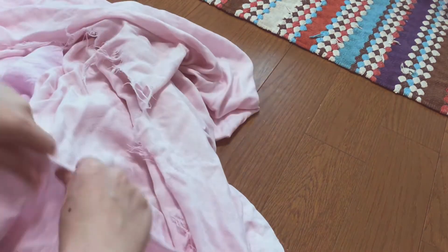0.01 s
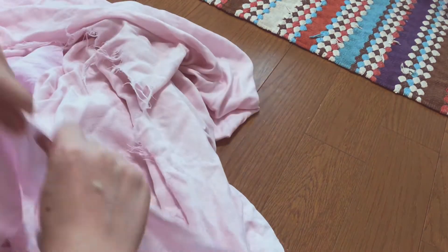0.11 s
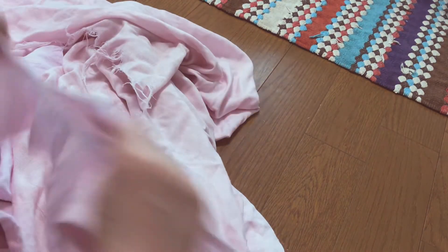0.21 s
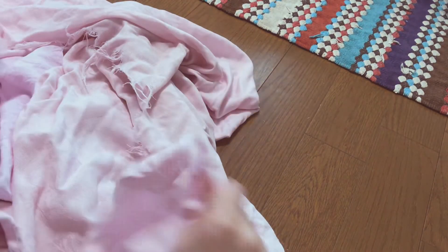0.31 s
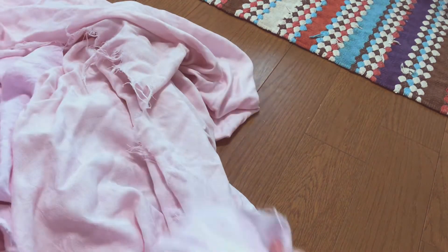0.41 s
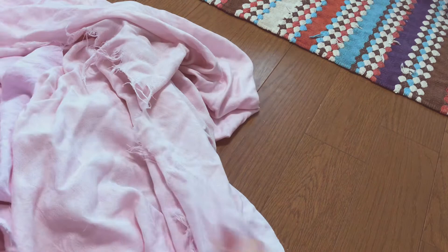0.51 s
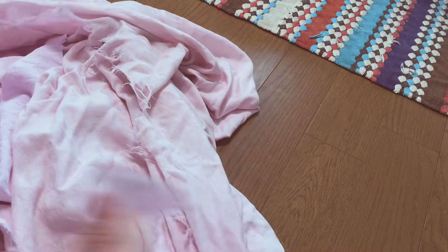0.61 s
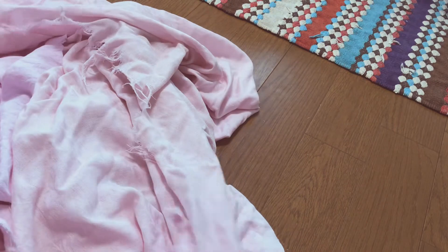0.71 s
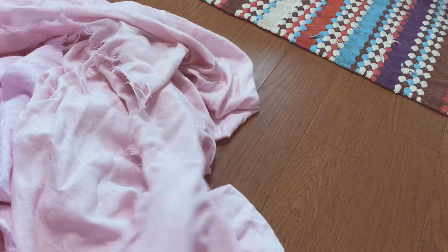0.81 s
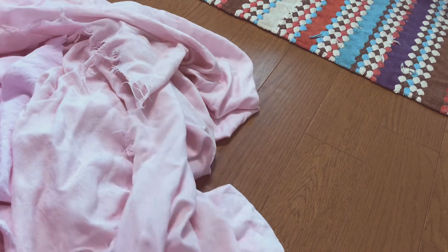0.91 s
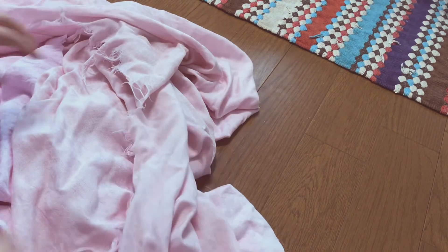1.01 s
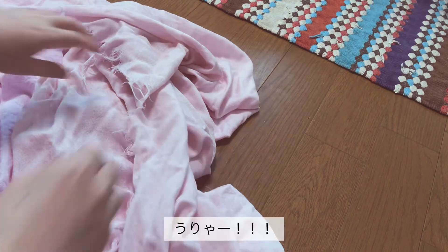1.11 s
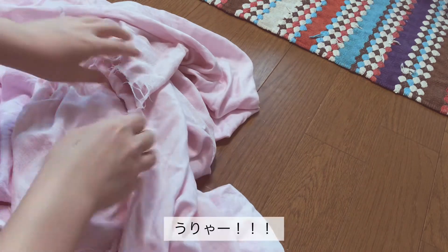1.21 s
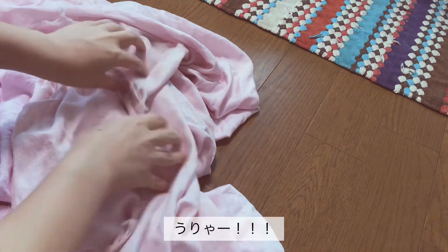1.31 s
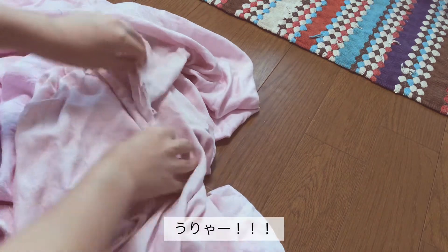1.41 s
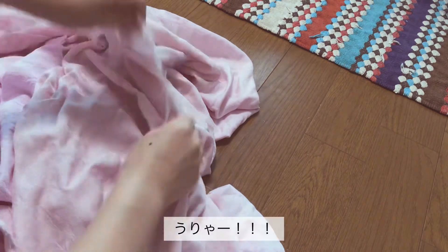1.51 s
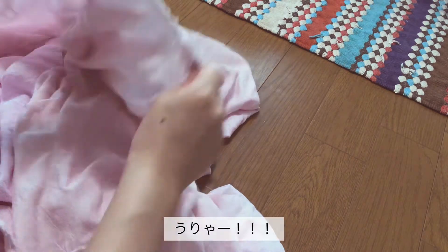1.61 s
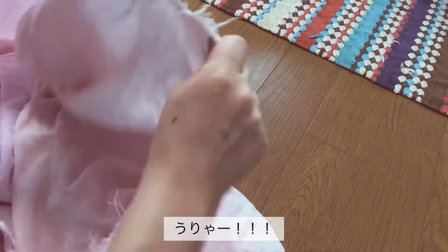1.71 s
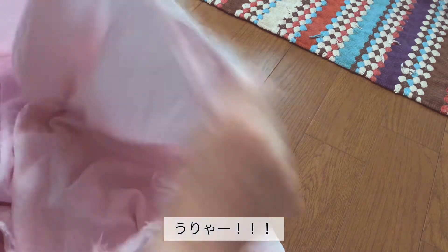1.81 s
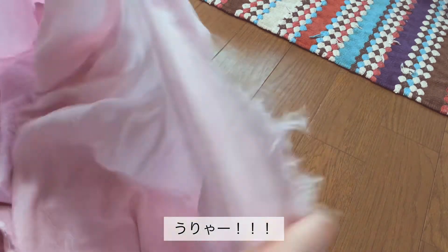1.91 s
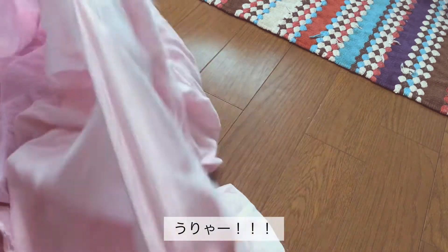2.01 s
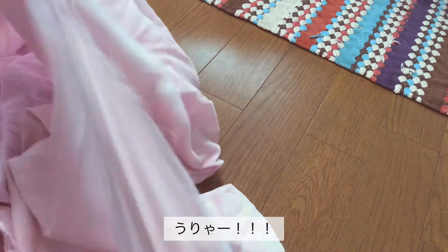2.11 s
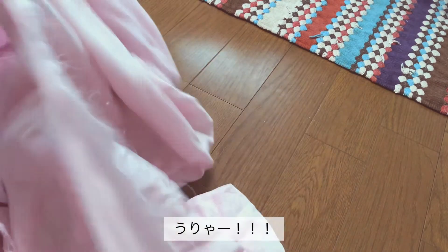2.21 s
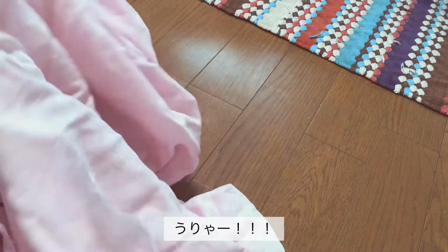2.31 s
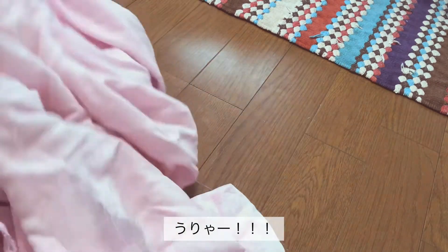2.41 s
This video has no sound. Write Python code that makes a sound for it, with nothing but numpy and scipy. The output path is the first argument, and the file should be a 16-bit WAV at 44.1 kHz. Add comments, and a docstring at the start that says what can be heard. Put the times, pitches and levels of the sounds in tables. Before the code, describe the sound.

Cotton cloth is ripped by hand close to the microphone: one bright, crackling tear at the start, a long pause with faint sliding fabric and a soft hand thud, then two short, jerky, duller rips in a quiet room.

```python
"""Three short rips are heard first of all: an old cotton sheet torn by hand close to the microphone, in a
quiet room. Random thread snaps ring fibres, threads, cloth, fold, sheet and flap; lone strong threads tick on top.
Between rips sliding cloth hisses faintly, as shaped noise, and a hand lands softly as a few dull decaying modes.
Feedback delays give the room's reply. Behind lie noise bands of room tone, hum, rumble and a thin high whirr."""
import sys
import numpy as np
from scipy import signal
from scipy.fft import rfft, irfft, next_fast_len
from scipy.io import wavfile
from scipy.ndimage import uniform_filter1d

SR = 44100
rng = np.random.default_rng(int(sys.argv[2]) if len(sys.argv) > 2 else 0)


def master(y):
    """Save y as 16-bit WAV."""
    cut = np.clip(np.atleast_2d(y).T, -1, 1)
    pcm = np.round(cut * 32767)  # scale
    wavfile.write(sys.argv[1], SR, pcm.astype(np.int16))


N = 110250  # length in samples: 2.5 s


def from_db(db):
    """Decibels to gain."""
    return 10 ** (np.asarray(db) / 20)


def rms_one(x):
    """Scale to rms 1."""
    return x / np.sqrt(np.mean(x ** 2) + 1e-20)


def in_time(rows):
    """Join the rows of a time table by straight lines; one curve per column, per sample."""
    seconds, *columns = np.transpose(rows)
    return [np.interp(np.arange(N) / SR, seconds, column) for column in columns]


def resonance(x, hz, width_hz):
    """Two-pole band-pass, gain 1 on top: a wider band rings for a shorter time."""
    radius = np.exp(-np.pi * width_hz / SR)
    feed = np.array([1, 0, -1]) * (1 - radius ** 2) / 2
    feedback = [1, -2 * radius * np.cos(2 * np.pi * hz / SR), radius ** 2]
    return signal.lfilter(feed, feedback, x + 1e-18)


def drift(rate_hz):
    """Slow random wander with rms 1: noise through two equal one-pole low-passes."""
    pole = np.exp(-2 * np.pi * rate_hz / SR)
    wander = signal.lfilter([1], [1, -2 * pole, pole ** 2], rng.standard_normal(N + SR))
    return rms_one(wander[SR:])  # the first second lets the filter settle


def high_pass(x, order, hz):
    """Butterworth high-pass: takes away what lies below hz."""
    return signal.sosfilt(signal.butter(order, hz, "high", fs=SR, output="sos"), x)


def coloured(spectrum, patchy_db):
    """Half-octave bands of noise, each with its own level and flicker; rms 1."""
    hz, db = np.transpose(spectrum)
    edges = 22 * 2 ** np.arange(0, 9.9, .5)
    white = rng.standard_normal((2, N + SR))  # neighbouring bands take different noise
    out = 0
    for k, (low, high) in enumerate(zip(edges, edges[1:])):
        band_filter = signal.butter(2, [low, high], "band", fs=SR, output="sos")
        band = signal.sosfilt(band_filter, white[k % 2])[SR:]
        band_db = np.interp(np.log(low * high) / 2, np.log(hz), db)
        out = out + band * from_db(band_db + patchy_db * drift(4.5))
    return rms_one(out)


EVEN_SAMPLES = 900  # span over which a ringing body is evened out


def struck(clicks, body, cycles):
    """Each click rings every resonance of a body with random strength; partly evened, then rms 1."""
    ring = 0
    for k, (hz, db) in enumerate(body):
        blows = clicks * from_db(rng.normal(0, 2.5, N))
        tone = resonance(resonance(blows, hz, hz / cycles), hz, 4.8 * hz / cycles)
        ring = ring + (-1) ** k * from_db(db) * tone
    power = uniform_filter1d(ring ** 2, size=EVEN_SAMPLES)
    return rms_one(ring / (power + 1e-12) ** 0.33)


# The tear jumps ahead in jerks. Each row: start in seconds, length in seconds, extra level in dB.
JERKS = [(1.838, .002, 8), (1.874, .0015, 10), (1.877, .002, 8), (1.882, .006, 5), (1.892, .004, 7),
         (1.903, .012, 4), (1.917, .006, 5), (1.934, .0085, 7), (1.949, .004, 9), (1.967, .002, 7),
         (1.974, .003, 5), (1.987, .0045, 10), (1.994, .003, 9), (2.0015, .0012, 14), (2.009, .003, 9),
         (2.143, .002, 7), (2.152, .006, 12), (2.160, .003, 6), (2.168, .0022, 14), (2.176, .004, 13),
         (2.1825, .007, 10), (2.204, .003, 6), (2.222, .006, 8), (2.239, .003, 13), (2.251, .008, 8),
         (2.276, .003, 5)]
JERK_FADE_S = .001


def jerks_db():
    """Each jerk sets in at once, holds and fades, as a rise in dB."""
    t = np.arange(N) / SR
    total = 0
    for start, length, db in JERKS:
        fade = np.exp(-np.clip((t - start - length) / JERK_FADE_S, 0, 50))
        total = total + db * (t >= start) * fade
    return total


# The three rips, close to the microphone, one list of rows each. Each row: time in seconds, then level in dB,
# before the jerks, of the finest crackle, thread snap, taut cloth's upper, middle and low ring, and flap.
RIP_LEVELS = [
    [(0.187, -46, -48, -71, -79, -74, -67), (0.191, -52, -46, -56.5, -60, -80, -65),
     (0.209, -50, -58, -66, -68, -75, -62), (0.223, -35.5, -42, -52, -58, -62, -80),
     (0.243, -41, -38, -49.5, -60, -64, -60), (0.261, -28, -48, -38, -43, -46.5, -68),
     (0.281, -28, -30, -31.5, -44, -59, -72), (0.297, -25, -32, -34.5, -49.5, -55, -60),
     (0.311, -33.5, -35.5, -44.5, -47, -56, -55), (0.323, -27.5, -33, -43, -46, -52, -62),
     (0.333, -28.5, -34.5, -36, -41.5, -48, -69), (0.34, -34.5, -36, -45.5, -51.5, -52, -47)],
    [(1.838, -57.5, -54.5, -52, -59, -45, -58), (1.854, -52, -52, -48, -48, -58.5, -50),
     (1.878, -45, -45.5, -39, -44, -43, -43.5), (1.892, -45, -45.5, -42.5, -48, -39, -39),
     (1.904, -41, -36.5, -35, -41, -47, -47), (1.926, -38, -41, -38.5, -37.5, -34, -47),
     (1.938, -44, -39.5, -42, -44, -48, -40), (1.95, -41.5, -45, -59, -51, -46, -40.5),
     (1.974, -49, -51, -45, -45, -40.5, -38.5), (1.982, -80, -64, -58, -63, -63, -64),
     (1.99, -50, -54.5, -49, -46, -45.5, -65), (2.03, -92, -74, -82, -83, -77, -51)],
    [(2.143, -69.5, -58.5, -69.5, -57, -55, -58), (2.155, -49, -55, -52, -50.5, -47, -52),
     (2.171, -53, -56.5, -66, -60, -57, -44), (2.183, -47, -51, -52.5, -61, -42, -45),
     (2.201, -60, -51, -53.5, -47, -72, -46), (2.217, -50.5, -52, -51, -59, -44.5, -52),
     (2.225, -52, -49, -51.5, -46, -40, -29.5), (2.233, -57.5, -63, -63, -60, -72, -56),
     (2.239, -55.5, -54, -47, -56, -59, -35), (2.257, -55, -55, -49, -55.5, -41.5, -47.5),
     (2.265, -64, -71, -64, -59, -69, -50), (2.277, -68, -73, -77, -63, -65, -45),
     (2.3, -76, -67, -78, -64, -83, -63)],
]
# What the snaps set ringing. Each row of these six: frequency in Hz, relative level in dB.
FIBRE_MODES = [(8500, -1.5), (10500, -3.7), (12500, -0.1), (14200, 3.6), (15500, 1.3)]  # finest crackle
THREAD_MODES = [(4200, -1), (5100, 2.6), (6000, 5), (7200, 2)]  # thread snap
CLOTH_MODES = [(1620, 5.5), (1950, 2), (2250, 3.5), (2600, 1.5), (2950, 3), (3350, 0.5), (3700, -1)]  # upper ring
FOLD_MODES = [(820, -1.5), (950, 1), (1100, 1.5), (1300, -4)]  # middle ring
SHEET_MODES = [(250, -2), (340, -1), (470, -2.5), (610, -3.5)]  # low ring
FLAP_MODES = [(60, 3.5), (98, 1.5), (170, -7.5)]  # flap
SNAPS_PER_MS, LOUD_DB = 5.5, -30  # snap rate at the loud level
RATE_FOLLOWS = .4  # dB of rate per dB of level: louder tearing breaks threads faster
SNAP_SPREAD_DB, CLUMP_DB, CLUMPS_PER_S = 3, 2.6, 290  # scatter of snap sizes and their wander
STEADY_SAMPLES = 130  # span over which the train of snaps is evened out


def rips():
    """Threads break at random under a steady pull; one train of snaps drives every body of the cloth."""
    silent = [-120] * 6
    rows = []
    for rip in RIP_LEVELS:
        before, after = rip[0][0] - .001, rip[-1][0] + .004
        rows += [(before, *silent), *rip, (after, *silent)]
    levels, jerk_db = in_time(rows), jerks_db()

    tearing_db = np.maximum(levels[0], levels[2]) + jerk_db
    per_ms = SNAPS_PER_MS * from_db(RATE_FOLLOWS * (tearing_db - LOUD_DB))
    chance = np.clip(per_ms, .4, 30) * 1000 / SR  # of a snap at each sample
    scatter_db = SNAP_SPREAD_DB * np.minimum(rng.exponential(1, N), 3)
    sizes = from_db(scatter_db + CLUMP_DB * drift(CLUMPS_PER_S))
    snaps = sizes * rng.choice([-1, 1], N) * (rng.random(N) < chance)
    snaps = snaps / np.sqrt(uniform_filter1d(snaps ** 2, size=STEADY_SAMPLES) + 1e-6)

    # Each row: modes, cycles setting the width of the resonances, share of the jerks that the body shows.
    bodies = [(FIBRE_MODES, 3.0, .95), (THREAD_MODES, 3.0, .95), (CLOTH_MODES, 9.0, .7),
              (FOLD_MODES, 6.0, .6), (SHEET_MODES, 3.2, .2), (FLAP_MODES, 4.0, 0)]
    out = 0
    for db, (body, cycles, share) in zip(levels, bodies):
        out = out + from_db(db + share * jerk_db) * struck(snaps, body, cycles)
    return out


# Lone strong threads near the microphone. Each row: time in seconds, click level in dB before its ringing.
LONE_SNAPS = [(0.1874, -31), (0.1932, -41), (0.2004, -27), (0.2073, -19.5), (0.2154, -28), (0.2187, -24),
              (0.226, -19), (0.2344, -17), (0.2558, -16), (1.874, -24), (1.9405, -36), (1.9484, -35)]


def lone_snaps():
    """The strongest single threads: a bright tick with a faint cloth ring."""
    seconds, db = np.transpose(LONE_SNAPS)
    clicks = np.zeros(N)
    clicks[(seconds * SR).astype(int)] = from_db(db) * rng.choice([-1, 1], len(seconds))
    tick = resonance(clicks, 5400, 3500) - resonance(clicks, 13000, 4500)
    cloth_ring = resonance(clicks, 2600, 1500)
    return from_db(5) * tick + from_db(4) * cloth_ring


# A hand lands on the heap of cloth. Each row: start in seconds, level in dB before the modes' own levels.
HAND_LANDINGS = [(1.326, -47.5)]
# Dull modes of that contact. Each row: frequency in Hz, relative level in dB, time to fall 60 dB in seconds.
THUD_MODES = [(376, 5.5, 0.023), (500, 4, 0.017), (593, 2, 0.022), (806, -7, 0.0087), (1610, -4, 0.01)]


def thud():
    """A soft contact rings a few dull modes, each a decaying sine with a rounded start."""
    t = np.arange(N) / SR
    out = 0
    for start, db in HAND_LANDINGS:
        age = np.maximum(t - start, 0)
        ring = 0
        for hz, mode_db, t60 in THUD_MODES:
            ring = ring + from_db(db + mode_db - 60 * age / t60) * np.sin(2 * np.pi * hz * age)
        out = out + ring * (1 - np.exp(-age / 0.0016))
    return out


# Cloth sliding on cloth. Each row: time in seconds, level in dB.
RUSTLE_LEVEL = [(0, -69), (.18, -69), (.4, -60.5), (.55, -63), (.742, -62), (.75, -71), (1.3, -73),
                (1.42, -70.5), (1.55, -71.5), (1.8, -68.5), (2.1, -70), (2.5, -70.5)]
# Colour of that hiss. Each row: frequency in Hz, relative level per hertz in dB.
RUSTLE_COLOUR = [(180, -31), (300, -3), (354, -3.5), (502, -3.5), (900, -9.5), (3890, -12), (14700, -17.5),
                 (16000, -24)]
# Light bright brushes. Each row: middle in seconds, length in seconds, level in dB at the middle.
BRUSHES = [(1.58, 0.17, -71), (1.72, 0.06, -69), (2.417, 0.054, -63.5)]
BRUSH_LOW_HZ = 4300


def rustle():
    """Sliding cloth is noise: an even hiss that stops short, and a few bright bell-shaped brushes."""
    t = np.arange(N) / SR
    hiss = from_db(in_time(RUSTLE_LEVEL)[0]) * coloured(RUSTLE_COLOUR, patchy_db=0.5)
    bright = rms_one(high_pass(rng.standard_normal(N), 2, BRUSH_LOW_HZ))
    strokes = sum(from_db(db) * np.exp(-(2 * (t - middle) / length) ** 2) for middle, length, db in BRUSHES)
    return hiss + strokes * bright


ROOM_T60_S, WALL_CUT_HZ = 0.23, 19200  # bass decay time; low-pass corner of each round
ROOM_DB = -21  # gain of the room's reply
ROOM_PEAK_HZ, ROOM_PEAK_WIDTH_HZ, ROOM_PEAK_DB = 3040, 2900, -4.5  # added to favour the upper middle


def room(x):
    """Ten feedback delays, duller on every round, worked out as one spectrum."""
    size = next_fast_len(N + SR)
    one_late = np.exp(-2j * np.pi * np.arange(size // 2 + 1) / size)  # a delay of one sample
    dull = np.exp(-2 * np.pi * WALL_CUT_HZ / SR)
    wall = (1 - dull) / (1 - dull * one_late)
    answer = 0
    lags = (rng.uniform(.006, .03, size=10) * SR).astype(int)
    for k, lag in enumerate(lags):
        loop = from_db(-60 * lag / SR / ROOM_T60_S) * wall * one_late ** lag
        answer = answer + (-1) ** k * loop / (1 - loop)
    x = x + from_db(ROOM_PEAK_DB) * resonance(x, ROOM_PEAK_HZ, ROOM_PEAK_WIDTH_HZ)
    return irfft(rfft(x, size) * answer, size)[:N]


def narrow_noise(hz, width_hz):
    """Noise through two equal resonances wavers like an unsteady tone; rms 1."""
    once = resonance(rng.standard_normal(N + SR), hz, width_hz)
    return rms_one(resonance(once, hz, width_hz)[SR:])


# Room tone. Each row: frequency in Hz, relative level per hertz in dB.
AIR_COLOUR = [(82, -24), (140, -2), (188, 13), (221, -8), (385, -8), (550, -20), (657, -10), (740, -13),
              (5070, -39), (9750, -43), (16000, -21.5)]
# Pauses of the whirr. Each row: from seconds, to seconds.
WHIRR_PAUSES = [(1.145, 1.18), (1.615, 1.75)]
AIR_DB = -69
# Widths are those of each of the two resonances.
HUM_HZ, HUM_WIDTH_HZ, HUM_DB = 91, 11.1, -58
RUMBLE_HZ, RUMBLE_WIDTH_HZ, RUMBLE_DB, RUMBLE_SWELL_DB = 52.7, 32, -56.5, 0.8
WHIRR_HZ, WHIRR_WIDTH_HZ, WHIRR_DB = 9580, 280, -79


def background():
    """Noise bands: room tone, a wavering low hum, a swelling rumble and a high whirr that pauses twice."""
    t = np.arange(N) / SR
    air = from_db(AIR_DB) * coloured(AIR_COLOUR, patchy_db=0.74)
    hum = from_db(HUM_DB) * narrow_noise(HUM_HZ, HUM_WIDTH_HZ)
    rumble_db = RUMBLE_DB + RUMBLE_SWELL_DB * drift(7.2)
    rumble = from_db(rumble_db) * narrow_noise(RUMBLE_HZ, RUMBLE_WIDTH_HZ)
    paused = sum((t > start) & (t < end) for start, end in WHIRR_PAUSES)
    whirr_on = uniform_filter1d(1. - paused, size=300)  # softened edges
    whirr = from_db(WHIRR_DB) * whirr_on * narrow_noise(WHIRR_HZ, WHIRR_WIDTH_HZ)
    return air + hum + rumble + whirr


def scene():
    """Near rips, snaps and thud with their room reply, over the rustle and the background."""
    near = rips() + lone_snaps() + thud()
    mix = near + from_db(ROOM_DB) * room(near) + rustle() + background()
    return mix[None]  # one channel


MIC_LOW_HZ, CUTOFF_HZ = 35.7, 15750


def record(dry):
    """The microphone loses the deepest bass; the top is cut steeply."""
    thin = high_pass(dry, 3, MIC_LOW_HZ)
    return signal.sosfilt(signal.ellip(8, .5, 70, CUTOFF_HZ, fs=SR, output="sos"), thin)


dry = scene()
out = record(dry)
master(out)
```